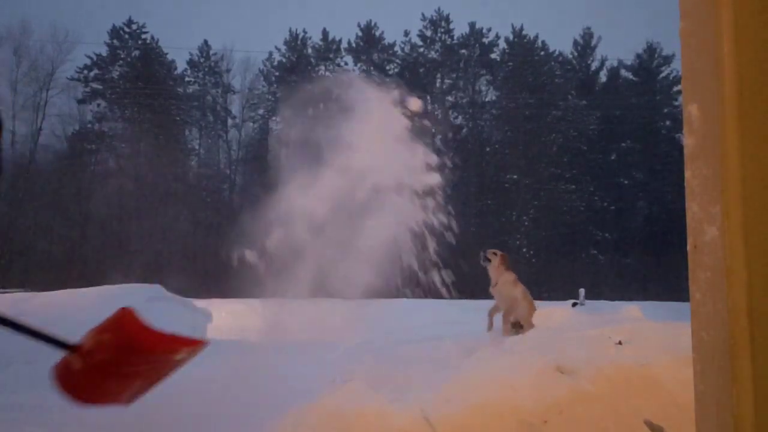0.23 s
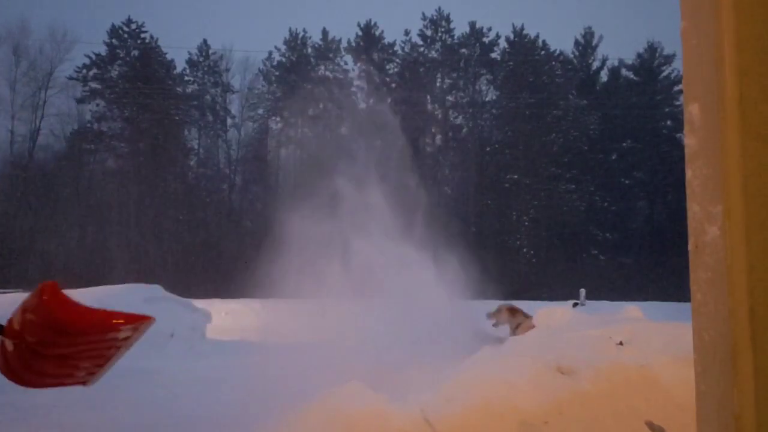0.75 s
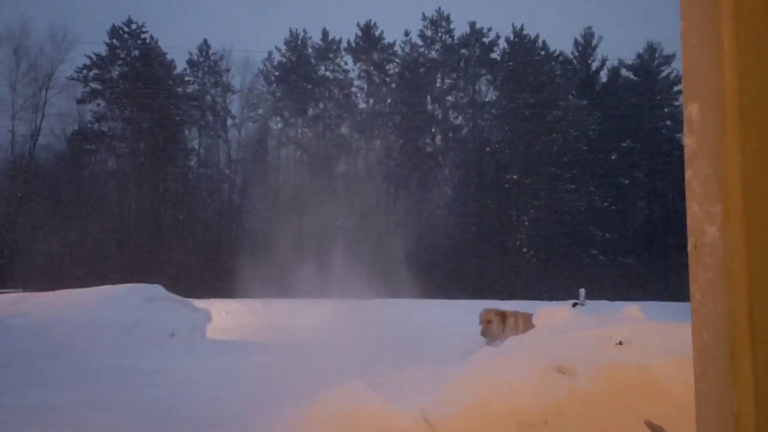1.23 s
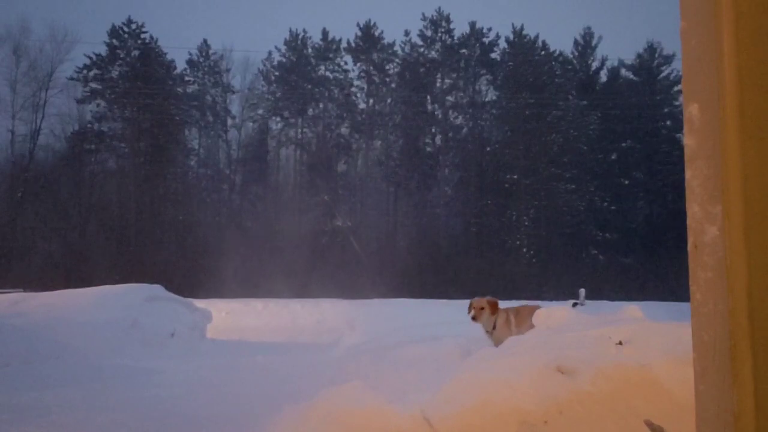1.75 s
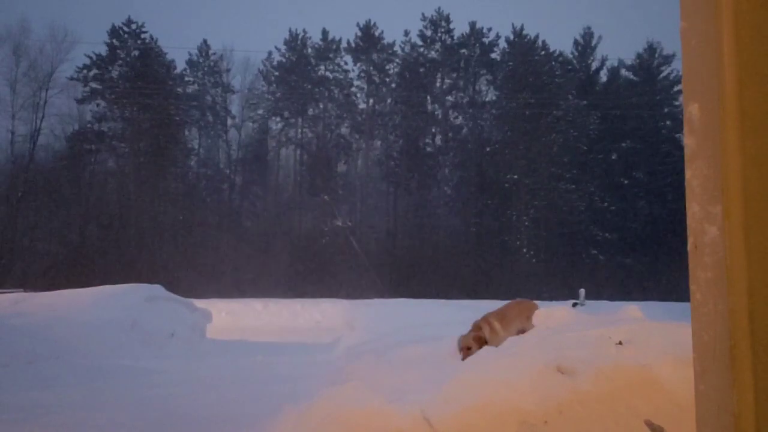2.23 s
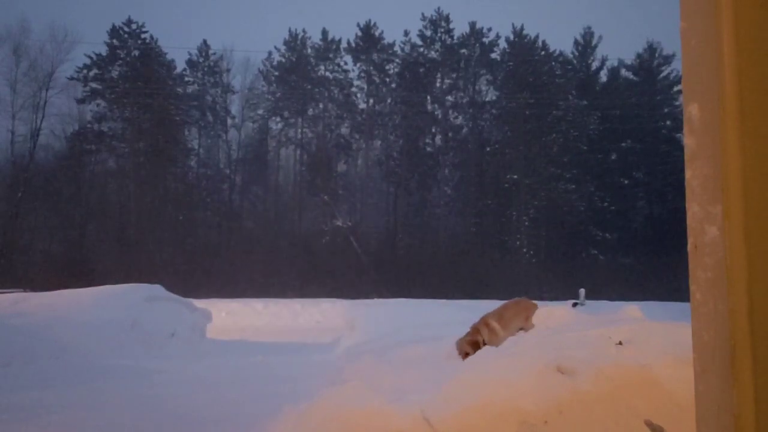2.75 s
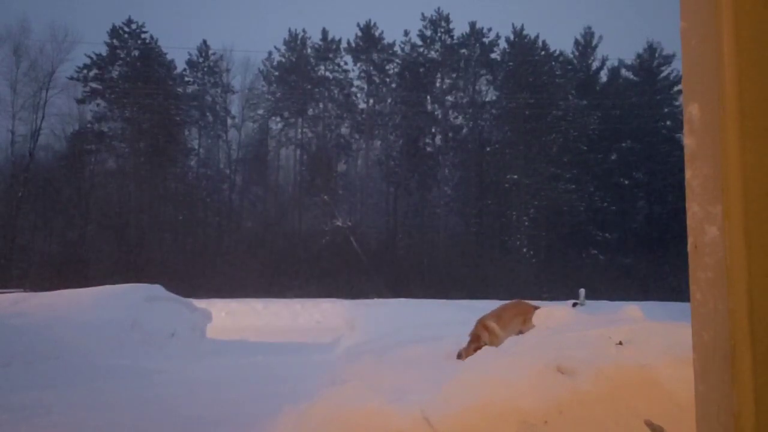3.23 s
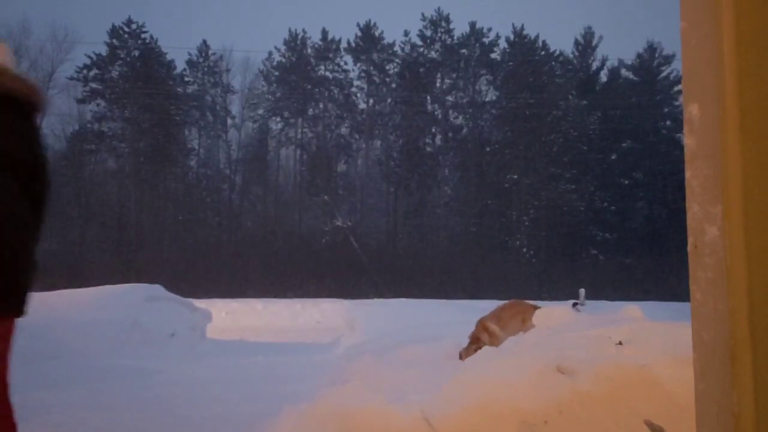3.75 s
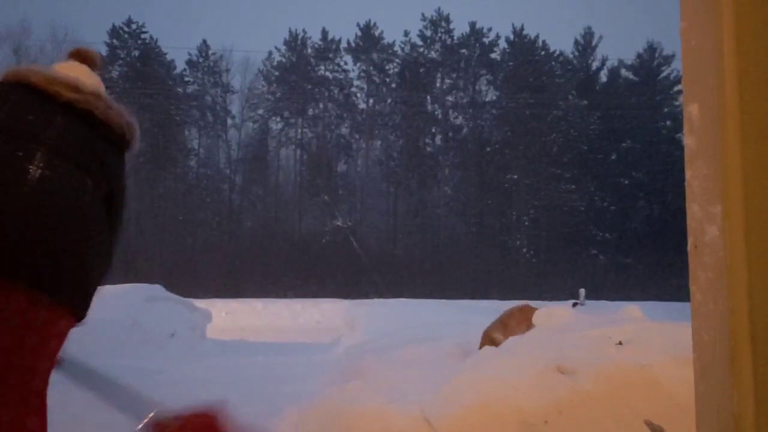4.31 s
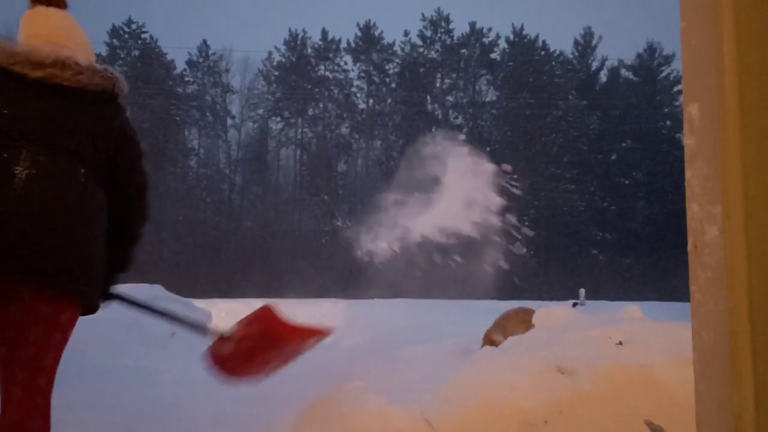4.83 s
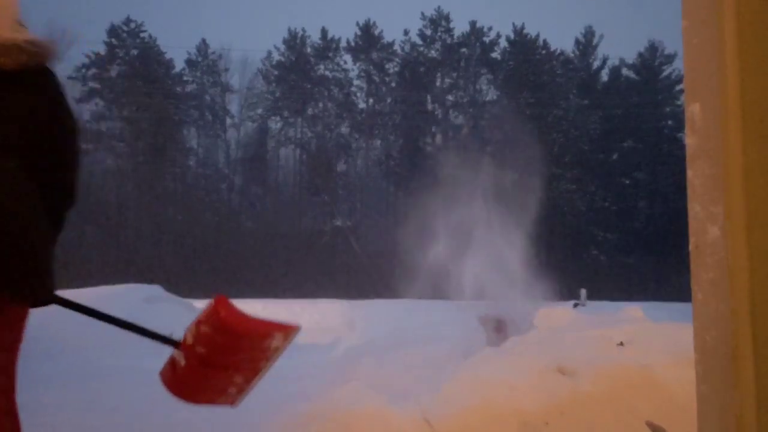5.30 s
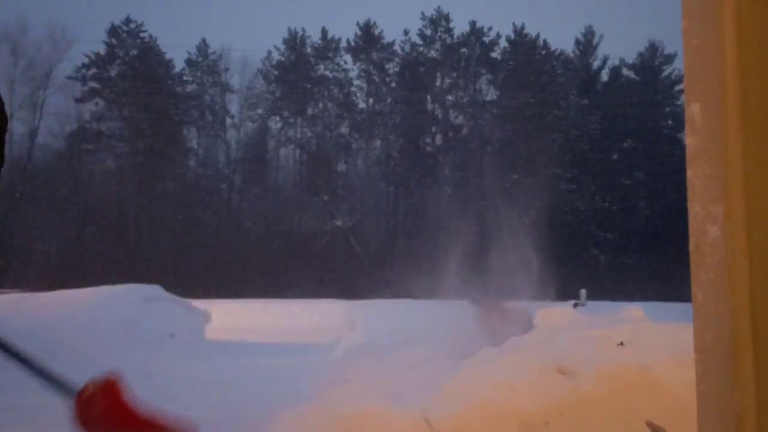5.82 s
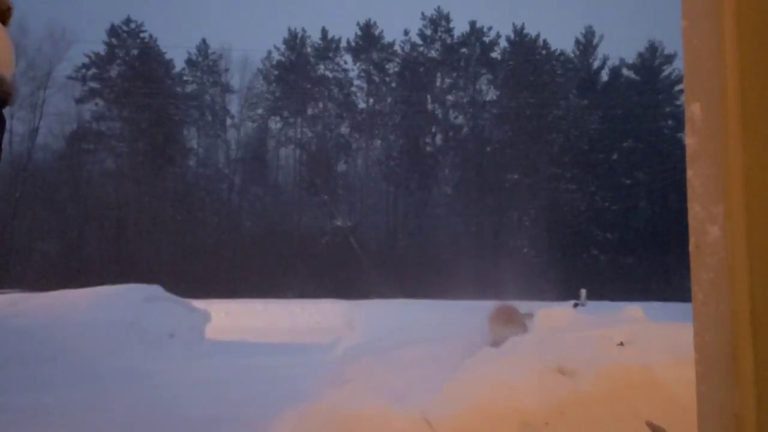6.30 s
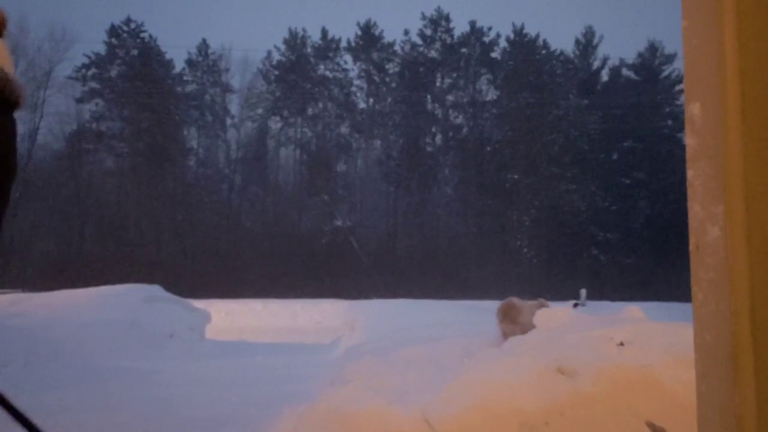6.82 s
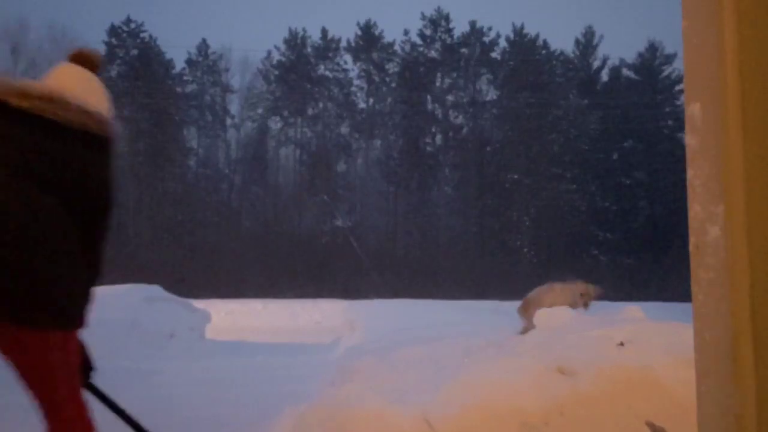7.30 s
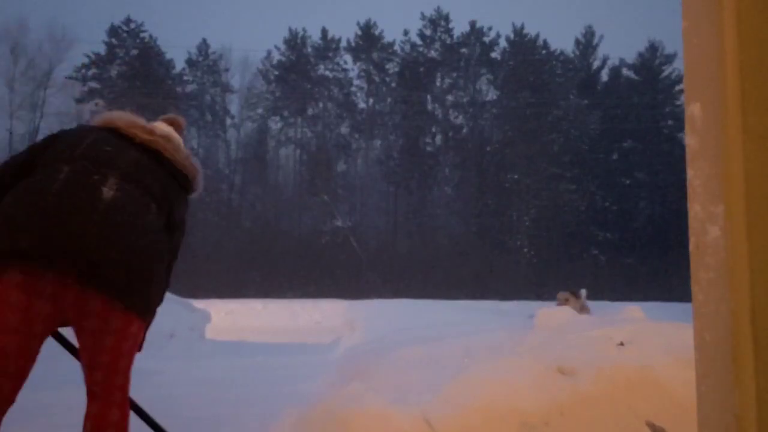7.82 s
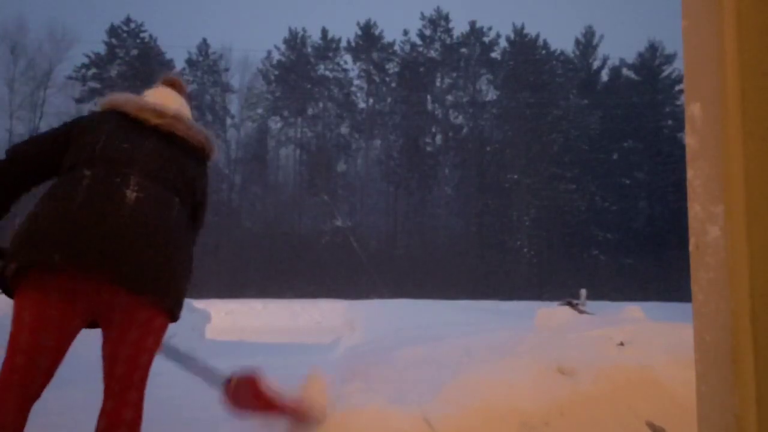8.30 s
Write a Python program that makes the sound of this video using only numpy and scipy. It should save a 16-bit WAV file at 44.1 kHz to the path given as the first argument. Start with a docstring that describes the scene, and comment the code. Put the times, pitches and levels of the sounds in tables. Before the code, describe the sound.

Outdoors on a quiet wooden porch, a nearby plastic shovel pushes through dry snow twice. Each stroke is a gritty, rumbling scrape broken by hollow knocks as the edge catches on the boards. Before and between the strokes come light blade clacks, soft boot steps and the faint hiss of tossed powder, with one more toss at the end. The porch adds a short echo, and a low hum and barely audible chirps lie far off.

```python
"""A plastic snow shovel works a porch in two long strokes. First powder sifts and the raised blade clacks.
At 2.2 s the shovel lands, the boards ring, and the edge scrapes through dry snow, catching and knocking.
From 4.5 s thrown powder hisses down, the blade clacks again, boots thud and faint chirps sound far off.
The second stroke runs from 6.2 to 7.7 s; a last throw follows at 8.5 s.
Throughout, the porch echoes the shovel over a faint distant hum."""
import sys
import numpy as np
from scipy import signal
from scipy.fft import rfft, irfft, next_fast_len
from scipy.io import wavfile
from scipy.ndimage import uniform_filter1d, map_coordinates

SR = 44100
rng = np.random.default_rng(int(sys.argv[2]) if len(sys.argv) > 2 else 0)


def waveform_to_disk(signal):
    """Save audio, clipped to [-1, 1], as 16-bit WAV at the path in sys.argv[1]."""
    frames = np.transpose(np.atleast_2d(signal))
    scaled = np.clip(frames, -1, 1) * 32767
    samples = np.round(scaled).astype(np.int16)
    wavfile.write(sys.argv[1], SR, samples)


N = 377055
TIME = np.arange(N) / SR
TOP_HZ = 15900

# Shoves through the snow: (full force at [s], hold [s], rumble level [dB], grit offset [dB])
EDGE_SHOVES = [(2.39, 0.0528, -60, -18), (2.612, .02, -43, -5), (2.65, 0.061, -33.5, -7),
               (3.07, 0.052, -42, -7.5), (3.132, 0.16, -37, -7.5), (3.319, 0.054, -40, -5),
               (3.412, 0.061, -46.5, 0), (3.469, 0.16, -43, -4.5), (3.685, 0.27, -45.5, -1),
               (4.075, 0.012, -64, 2), (6.335, .11, -47, -3), (6.475, 0.16, -41, -6.5),
               (6.588, 0.16, -36.5, -4), (6.78, 0.067, -40.5, -5.5), (6.864, 0.089, -32.5, -5),
               (7.02, 0.24, -36, -4), (7.165, 0.075, -29.5, -5), (7.33, 0.08, -41.5, -3.5),
               (7.619, 0.034, -61.5, 1.5), (7.708, 0.015, -61.5, 6.5)]


def scraping():
    """The edge sticks and slips, shaking the blade (mono rumble); crystals break along it (stereo grit)."""
    rumble_gain, grit_gain = np.zeros(N), np.zeros(N)
    for s, hold_s, db, grit_db in EDGE_SHOVES:
        force = amp(db) * shove(s, hold_s)
        rumble_gain = np.maximum(rumble_gain, force)
        grit_gain = np.maximum(grit_gain, amp(grit_db) * force)
    rumble_gain *= amp(0.5 * wobble(20))  # the snow resists unevenly
    judder = wobble(110)  # uneven floor
    catches = unit(slips(per_s=650, spread_db=4))
    rumble = unit(band(tilted_blade(catches * amp(1.6 * judder)), 100, 1700))
    grit = []
    for _ in range(2):
        crystals = unit(slips(per_s=4000, spread_db=4)) + 0.46 * catches
        grit.append(band(tilted_blade(crystals * amp(0.83 * judder)), 2140, 15030))
    return amp(-0.1) * rumble_gain * rumble, amp(2) * grit_gain * unit(np.array(grit))


def shove(s, hold_s, attack_db_per_s=396.5, sag_db_per_s=21, release_db_per_s=174.5):
    """Gain of one shove: it bites, tires and lets go."""
    t = TIME - s
    attack_db = attack_db_per_s * np.minimum(t, 0)
    sag_db = sag_db_per_s * np.clip(t, 0, hold_s)
    release_db = release_db_per_s * np.maximum(t - hold_s, 0)
    return amp(np.maximum(attack_db - sag_db - release_db, -120))


def slips(per_s, spread_db):
    """Tiny random fractures of uneven but bounded size."""
    size_db = spread_db * np.minimum(rng.standard_normal(N), 2)
    return (rng.random(N) < per_s / SR) * rng.choice([-1, 1], N) * amp(size_db)


# Blade on snow: (frequency [Hz], density [dB])
BLADE_SPECTRUM = [(29, -56.5), (50, -27), (141, -9), (228, -4), (295, -4.5), (378, -4), (570, -5.5),
                  (630, -8), (760, -4.5), (955, -8), (1090, -5), (1770, -9.5), (4100, -12.5), (8650, -27.5),
                  (15800, -22.5)]
# Resonances of blade and floor: (frequency [Hz], width [Hz], gain [dB])
BLADE_MODES = [(236.3, 53, 3), (386, 24, 4), (455, 16, 5), (559, 37, 6), (879, 53, 5), (1075, 29, 4.5),
               (3910, 140, 0), (7220, 2000, 7)]
# Blade tilts: (time [s], bass gain [dB], hollow ring [Hz], edge ring [Hz], edge gain [dB])
BLADE_TILTS = [(2.299, -4, 735, 3800, 6), (3.3, -4, 780, 4073, 7.5), (3.75, -1, 1200, 2834, -5),
               (6.5, -2, 800, 4070, 5), (6.899, -1.5, 1080, 2960, 2), (7.24, -2.5, 700, 3400, 1)]


def tilted_blade(force):
    """A force drives the blade, whose resonances shift with tilt and load."""
    out, tilt_s = np.zeros(N), [row[0] for row in BLADE_TILTS]
    for share, (_, bass_db, hollow_hz, edge_hz, edge_db) in zip(np.eye(len(tilt_s)), BLADE_TILTS):
        peaks = [(190, 200, bass_db), (hollow_hz, 72, 2.5), (edge_hz, 420, edge_db)]
        blade = body(BLADE_SPECTRUM, BLADE_MODES + peaks, size=8192)
        out += through(force * np.interp(TIME, tilt_s, share), blade)
    return out


# Edge landing or catching: (time [s], boom [dB], ring [dB], crack [dB], ring t60 [s], boom pitch [Hz])
EDGE_KNOCKS = [(2.184, -22.5, -35, -38, .03, 440.4), (2.193, -17.5, -28, -37.5, 0.14, 238),
               (2.253, -23.5, -34, -35.5, .14, 297), (2.644, -37, -49, -31.5, 0.098, 517),
               (2.708, -22.5, -30, -34, 0.1, 456), (3.243, -32, -32.5, -49.5, 0.057, 333),
               (3.459, -29, -24, -32, .09, 552), (3.572, -36, -28, -41.5, 0.044, 550),
               (3.627, -33, -52, -56, 0.053, 173), (3.876, -27.5, -34, -29.5, 0.053, 324),
               (3.96, -53, -38.5, -44, .019, 450), (4.162, -39, -46, -52.5, 0.12, 295),
               (4.206, -39.5, -45.5, -47.5, 0.031, 431), (6.196, -38, -46.5, -43, 0.32, 351),
               (6.213, -32, -37, -49, .097, 223), (6.561, -30.5, -29.5, -39.5, .14, 242),
               (6.849, -33.5, -28.5, -31, 0.14, 554), (6.925, -35, -37.5, -38.5, .05, 385),
               (7.017, -39.5, -30.5, -40, 0.063, 453), (7.151, -29, -38.5, -39, .07, 453),
               (7.174, -36, -27, -39.5, .05, 387), (7.228, -13.5, -17.5, -27, .066, 391),
               (7.28, -31, -46.5, -33, .03, 244), (7.382, -25.5, -37, -54, .05, 377),
               (7.651, -54, -51, -52, 0.071, 563), (7.701, -50, -50.5, -55, 0.12, 246)]


def knocks(shaft_hz=2754, shaft_t60_s=0.16, scoop_t60_s=0.12):
    """Each catch booms in the floor, rings blade, shaft and scoop, and cracks the crust."""
    out, t = np.zeros(N), TIME[:SR // 2]
    tilt_s, _, hollow_hz, _, _ = np.transpose(BLADE_TILTS)
    shaft = np.sin(2 * np.pi * shaft_hz * t) * amp(-60 * t / shaft_t60_s)
    for s, boom_db, ring_db, crack_db, t60_s, boom_hz in EDGE_KNOCKS:
        ring_hz = np.interp(s, tilt_s, hollow_hz)
        contact_modes = [(boom_hz, 64, 4), (ring_hz, 64, 4)]  # favoured by the struck spot
        blade = body(BLADE_SPECTRUM, BLADE_MODES + contact_modes, size=8192)
        bass_hz = np.clip(390 - 1900 * t60_s, 70, 0.7 * boom_hz)  # longer contact reaches deeper
        boom = crest(band(through(blow(1.4 * t60_s, snap=0.71), blade), bass_hz, 663))
        ring = crest(band(through(blow(t60_s, snap=0.5), blade), 534, 2000))
        crack = crest(band(through(blow(t60_s, snap=0.86), blade), 2000, 15800))
        scoop = np.sin(2 * np.pi * boom_hz * t) * amp(-60 * t / scoop_t60_s)
        add(out, s, amp(boom_db - 5) * boom + amp(ring_db) * ring + amp(crack_db + 1) * crack)
        add(out, s, amp(crack_db - 11.5) * shaft + amp(boom_db - 2.5) * scoop)
    return out


def blow(t60_s, snap, size=16384):
    """Force of a contact: one sharp push, then crumbling that dies away."""
    force = rng.standard_normal(size) * amp(-60 * TIME[:size] / t60_s)
    force[0] += snap * np.linalg.norm(force)
    return force


# Floor board resonances: (frequency [Hz], relative level [dB], t60 [s])
BOARD_MODES = [(226, -6, 0.37), (284.6, -3, 0.71), (436, -4.5, 0.77), (505, -1, 0.53)]


def boards(drop_s=2.2, rise_s=0.033):
    """The floor rings on unsteadily under the dropped shovel."""
    t = np.maximum(TIME - drop_s, 0)
    ring = sum(amp(db - 60 * t / t60_s) * np.sin(2 * np.pi * hz * t + 2.2 * wobble(45))
               for hz, db, t60_s in BOARD_MODES)
    return amp(-32) * (1 - np.exp(-t / rise_s)) * ring


# Raised blade: (frequency [Hz], density [dB])
RAISED_SPECTRUM = [(300, -2), (800, -7.5), (1500, -5), (4000, -29), (9000, -27.5), (15500, -18.5)]
# Its resonances: (frequency [Hz], width [Hz], gain [dB])
RAISED_MODES = [(934, 70, 4), (1330, 140, 11), (1855, 270, 3)]
# Its clacks: (time [s], level [dB], crack offset [dB], snap offset [dB], t60 [s], ring pitch [Hz])
BLADE_CLACKS = [(0.169, -42.5, -13.5, -32, 0.075, 980), (0.298, -40, -3, -29, .055, 1314),
                (0.634, -49.5, -7.5, -10, 0.072, 1110), (5.06, -42, 1, -14, 0.04, 1420),
                (5.072, -52, 5.5, -14, .14, 1820), (5.31, -51.5, 4, 6, 0.045, 1250),
                (5.324, -40, -2, -23, 0.048, 1090)]


def clacks(after_hz=1880, after_t60_s=0.51):
    """The raised blade rattles on its shaft, higher and thinner, leaving a faint after-ring."""
    out, t = np.zeros(N), TIME[:SR // 2]
    for s, db, crack_db, snap_db, t60_s, hz in BLADE_CLACKS:
        blade = body(RAISED_SPECTRUM, RAISED_MODES + [(hz, 130, 9)])
        hit = through(blow(t60_s, snap=0.79), blade)
        ring = crest(band(hit, 780, 2100))
        crack = amp(crack_db) * crest(band(hit, 3050, 7100))
        snap = amp(snap_db + 2) * crest(band(hit, 7700, 14000))
        after_ring = np.sin(2 * np.pi * after_hz * t + 1.3 * wobble(62)[:len(t)])
        add(out, s, amp(db - 5.5) * (ring + crack + snap))
        add(out, s, amp(db - 28 - 60 * t / after_t60_s) * after_ring)
    return out


# Boots on the floor: (time [s], level [dB], pitch [Hz])
BOOT_STEPS = [(0.355, -67, 348), (1.849, -52, 158), (5.224, -54.5, 333), (5.842, -53, 145),
              (5.885, -55, 149)]


def steps():
    """A soft heel gives one low push of a few cycles."""
    out = np.zeros(N)
    for s, db, hz in BOOT_STEPS:
        thud = band(blow(t60_s=0.075, snap=0.29), 0.5 * hz, 1.33 * hz)
        add(out, s, amp(db + 5.5) * crest(thud))
    return out


# Swings of coat and shovel: (time [s], level [dB], half length [s], pitch [Hz])
SWINGS = [(0.454, -58.5, 0.023, 2610), (0.531, -62.5, 0.025, 1780), (0.643, -63.5, 0.04, 1080),
          (1.075, -60.5, 0.025, 1290), (4.547, -64, 0.038, 2140), (5.362, -62.5, 0.065, 1340),
          (5.866, -62, 0.017, 1480), (8.493, -59.5, 0.048, 1340)]


def swishes():
    """Cloth and sliding snow swell and fade with each swing."""
    out = np.zeros(N)
    for s, db, half_s, hz in SWINGS:
        rub = band(rng.standard_normal(N), 0.5 * hz, 1.11 * hz, order=1)
        out += amp(db) * swell(s, half_s) * unit(band(rub, 470, 7800, order=2))
    return out


# Squeak contour: (time [s], pitch [Hz], level [dB])
SQUEAK_PATH = [(.09, 1560, -80), (.11, 1604, -62.5), (.15, 1660, -81), (.18, 1726, -51.5), (.22, 1760, -96)]


def squeak():
    """One thin, rising, unsteady tone."""
    s, hz, db = np.transpose(SQUEAK_PATH)
    pitch_hz = np.interp(TIME, s, hz) * (1 + 0.0077 * wobble(144))
    gain = amp(np.interp(TIME, s, db)) * (TIME >= s[0]) * (TIME <= s[-1])
    return gain * np.sin(2 * np.pi * np.cumsum(pitch_hz) / SR)


# Throws of snow: (time [s], spray level [dB], sifting level [dB])
SNOW_THROWS = [(0, -94, -70.5), (4.554, -64, -77), (8.52, -72.5, -73.5)]


def powder(spray_half_s=0.033, cloud_rise_s=0.28, settle_db_per_s=15):
    """Each throw sprays off the blade and leaves a cloud that sifts down ever more faintly."""
    gain = np.zeros(N)
    for s, spray_db, sift_db in SNOW_THROWS:
        cloud = np.where(TIME < s, swell(s, cloud_rise_s), amp(-settle_db_per_s * (TIME - s)))
        gain += amp(spray_db) * swell(s, spray_half_s) + amp(sift_db) * cloud
    dust = hiss(11000, 14000, order=1)
    flakes = hiss(3000, 9000, order=1)
    return gain * (dust + 1.4 * flakes)


# Porch decay: (frequency [Hz], t60 [s])
PORCH_DECAY = [(100, 0.96), (250, 0.48), (480, 0.57), (900, 0.43), (3000, 0.51), (8000, 0.45), (15000, 0.5)]


def porch(point, wide, walls_db=-1.5, tail_db=-5, walls_t60_s=0.054, left_lag_s=0.00022):
    """A point source echoes off close walls; it and a wide stereo source feed a longer tail."""
    size = next_fast_len(N + SR)
    lag = np.exp(-2j * np.pi * np.fft.rfftfreq(size, 1 / SR) * left_lag_s)
    left = irfft(rfft(point, size) * lag, size)[:N]
    walls = echoes(point, lambda hz: np.full(len(hz), walls_t60_s), rise_s=0.0039, size=4096, count=140)
    tail = echoes(point + 0.79 * wide[0], lambda hz: along(PORCH_DECAY, hz),
                  rise_s=0.011, size=32768, count=40)
    return np.array([left, point]) + wide + amp(walls_db) * walls + amp(tail_db) * tail


def echoes(x, t60_at, rise_s, size, count):
    """Diffuse reflections, renewed count times as the shovel moves; t60_at(hz) sets their decay."""
    hop = N // count
    padded, wet = np.pad(x, (hop, 2 * hop)), np.zeros((2, N + hop))
    onset = 1 - np.exp(-TIME[:size] / rise_s)
    window = np.sin(np.pi * np.arange(2 * hop) / (2 * hop))
    for start in range(0, N + hop, hop):
        hz, s, spectra = signal.stft(diffuse(size), SR, nperseg=256)
        decay = amp(-60 * s / t60_at(hz)[:, None])
        tail = signal.istft(spectra * decay, SR, nperseg=256)[1][:, :size] * onset
        piece = padded[start:start + 2 * hop] * window
        add(wet, start / SR, signal.fftconvolve(piece[None], tail / np.linalg.norm(tail[0]), axes=1))
    return wet[:, hop:]


# Porch balance: (frequency [Hz], left over right [dB])
BALANCE = [(150, -0.3), (500, 2.5), (1000, 2), (8000, 1.7)]


def leftward(x):
    """The porch favours the left, most in the low middle."""
    size = next_fast_len(N + SR // 2)
    db = along(BALANCE, np.fft.rfftfreq(size, 1 / SR))
    return irfft(rfft(x, size) * amp([db / 2, -db / 2]), size)[:, :N]


# Quiet yard: (frequency [Hz], density [dB])
YARD_SPECTRUM = [(12, -46), (20, -17.5), (85, -8.5), (119, -8.5), (172, -20), (345, -21.5), (482, -24),
                 (969, -33), (1690, -31.5), (2000, -37), (2800, -37), (3500, -37), (7030, -46),
                 (15800, -37)]
# Its peaks: (frequency [Hz], width [Hz], gain [dB])
YARD_PEAKS = [(116.6, 8, 7), (483, 86, 4.5), (2650, 270, 2.5), (6960, 1500, 11)]


def yard(hum_hz=119, whine_hz=1700, chirp_hz=2770):
    """A distant hum, a thin whine and faint chirps, smeared by distance, in still air."""
    colour = body(YARD_SPECTRUM, YARD_PEAKS)
    air = unit(np.array([through(side, colour) for side in diffuse(N)])) * amp(0.29 * wobble(2.8))
    hum = np.sin(2 * np.pi * hum_hz * TIME + 0.63 * wobble(8.7)) * amp(1.6 * wobble(11))
    whine = hiss(whine_hz - 35, whine_hz + 35, order=2) * amp(2.5 * wobble(4))
    chirp_gain = sum(swell(s, half_s=0.02) for s in (4.93, 5.57, 5.615, 5.725, 5.765, 5.805, 6.0))
    chirps = chirp_gain * hiss(chirp_hz - 45, chirp_hz + 45, order=2)
    return amp(-63.5) * air + amp(-70) * hum + amp(-91.5) * whine + amp(-82) * chirps


def diffuse(size, gap_m=0.21):
    """Noise from all sides: two spaced microphones agree only in the bass."""
    hz = np.fft.rfftfreq(size, 1 / SR)
    coherence = 0.98 * np.sinc(2 * hz * gap_m / 343)
    angle = np.arccos(coherence) / 2
    mid, side = rfft(rng.standard_normal((2, size))) * [np.cos(angle), np.sin(angle)]
    return irfft([mid + side, mid - side], size)


def body(spectrum, peaks, size=16384):
    """Minimum-phase response of a spectrum with peaks (frequency [Hz], width [Hz], gain [dB])."""
    hz = np.fft.rfftfreq(size, 1 / SR)
    peaks_db = sum(db / (1 + (2 * (hz - peak_hz) / width_hz) ** 2) for peak_hz, width_hz, db in peaks)
    cepstrum = irfft(np.log(amp(along(spectrum, hz) + peaks_db) + 1e-6))
    cepstrum[1:size // 2] *= 2
    cepstrum[size // 2 + 1:] = 0
    return irfft(np.exp(rfft(cepstrum)))[:size // 2]


def through(x, response):
    """x played through an impulse response."""
    return signal.oaconvolve(x, response)[:len(x)]


def band(x, lo_hz, hi_hz, order=3):
    """Causal band-pass."""
    sos = signal.butter(order, [lo_hz, min(hi_hz, TOP_HZ)], "band", fs=SR, output="sos")
    return signal.sosfilt(sos, x)


def hiss(lo_hz, hi_hz, order):
    """Stereo band noise at rms 1."""
    return unit(band(rng.standard_normal((2, N)), lo_hz, hi_hz, order))


def wobble(per_s):
    """Smooth random curve, per_s knots a second."""
    return map_coordinates(rng.standard_normal(int(N * per_s / SR) + 4), [TIME * per_s])


def swell(s, half_s):
    """Bell-shaped gain around time s."""
    return np.exp(-((TIME - s) / half_s) ** 2 / 2)


def along(points, hz):
    """Interpolate (frequency [Hz], value) points on a log axis."""
    point_hz, values = np.transpose(points)
    return np.interp(np.log(hz + 1), np.log(point_hz), values)


def add(track, s, sound):
    """Mix a sound into a track at time s."""
    room = track[..., max(round(s * SR), 0):][..., :sound.shape[-1]]
    room += sound[..., :room.shape[-1]]


def amp(db):
    """Decibels to gain."""
    return 10 ** (np.asarray(db) / 20)


def unit(x):
    """x at rms 1."""
    return x / np.sqrt(np.mean(x ** 2) + 1e-20)


def crest(x):
    """x with its loudest 4 ms at rms 1."""
    return x / np.sqrt(uniform_filter1d(x ** 2, 176, mode="constant").max() + 1e-20)


def scene():
    """Shovelling on the porch, a little louder on the left, in the quiet yard."""
    rumble, grit = scraping()
    work = rumble + knocks() + boards() + clacks() + swishes() + squeak()
    return leftward(porch(work, grit)) + steps() + powder() + yard()


def record(dry):
    """Brick-wall low-pass at TOP_HZ."""
    size = next_fast_len(N + SR // 2)
    passband = np.fft.rfftfreq(size, 1 / SR) < TOP_HZ
    return irfft(rfft(dry, size) * passband, size)[:, :N]


dry = scene()
out = record(dry)
waveform_to_disk(out)
```